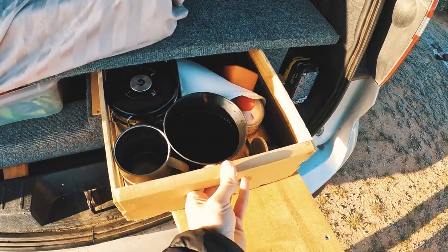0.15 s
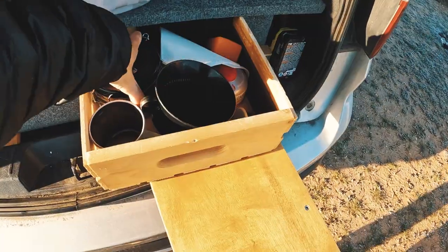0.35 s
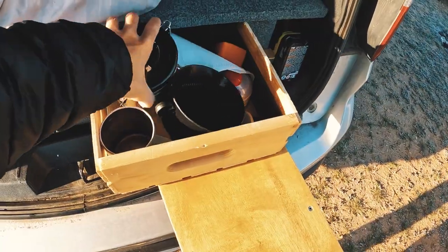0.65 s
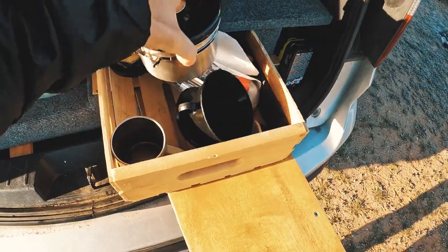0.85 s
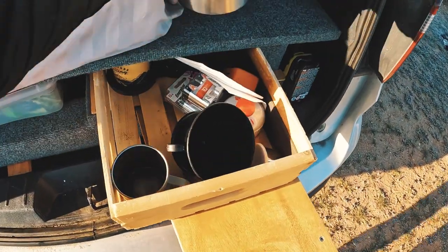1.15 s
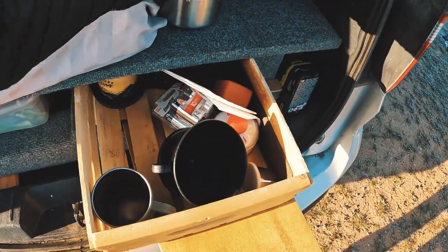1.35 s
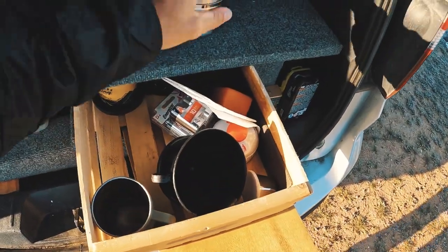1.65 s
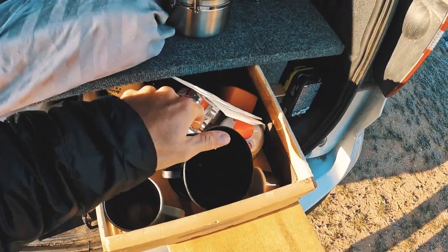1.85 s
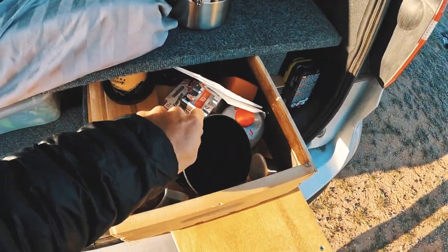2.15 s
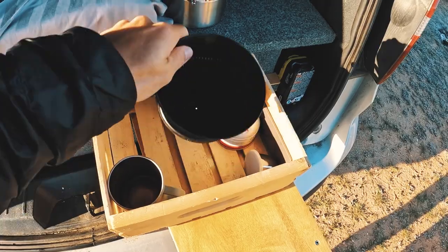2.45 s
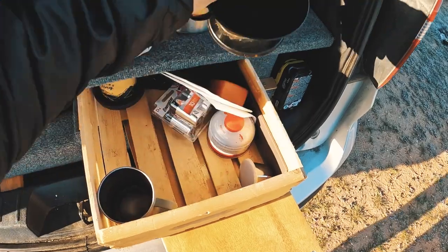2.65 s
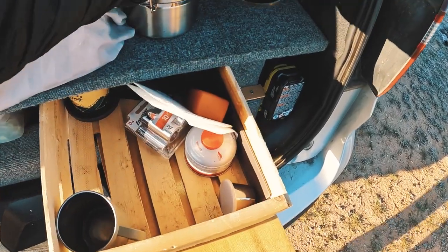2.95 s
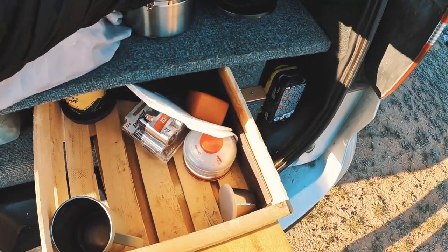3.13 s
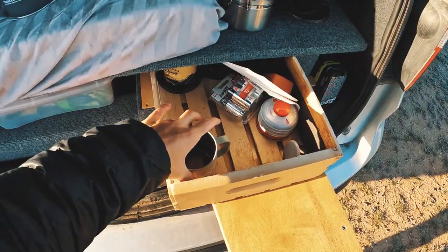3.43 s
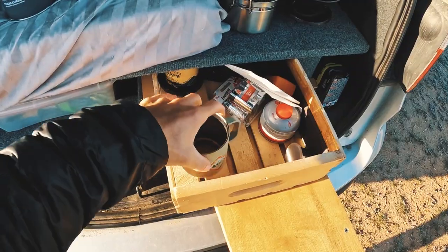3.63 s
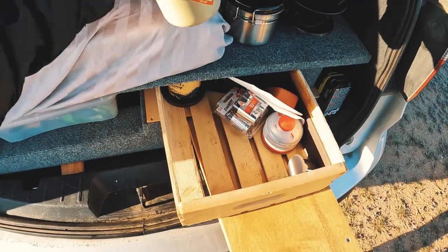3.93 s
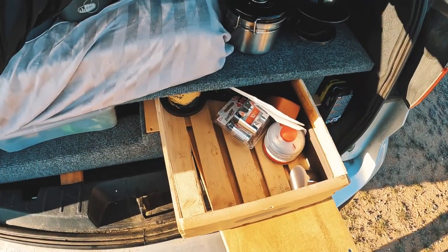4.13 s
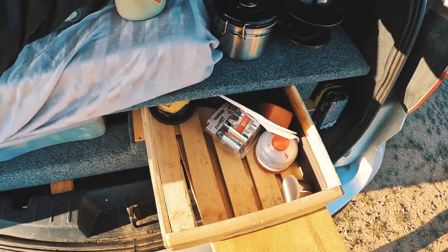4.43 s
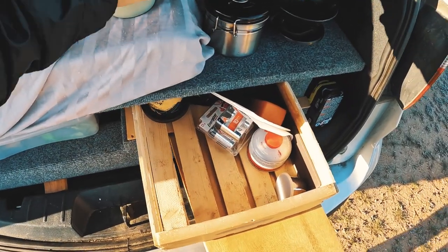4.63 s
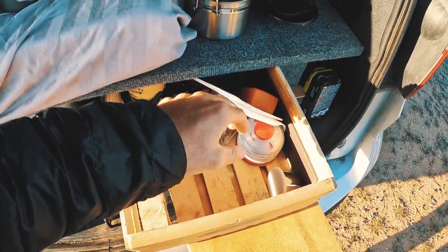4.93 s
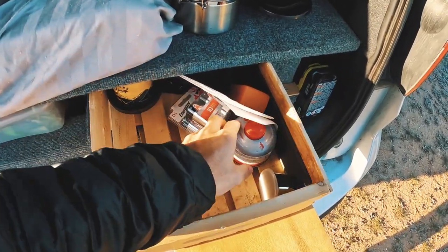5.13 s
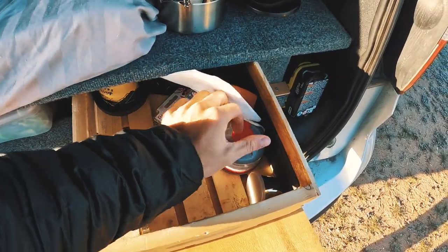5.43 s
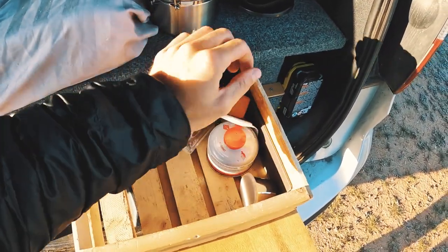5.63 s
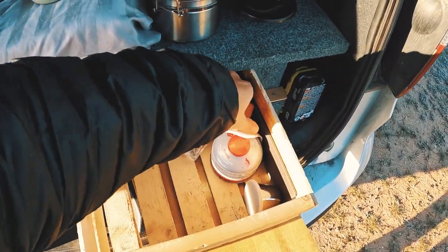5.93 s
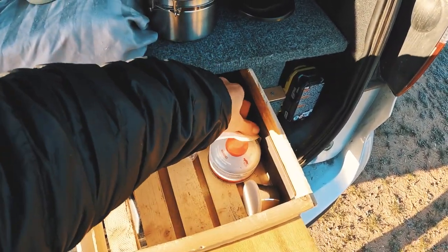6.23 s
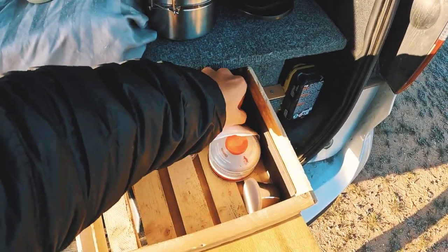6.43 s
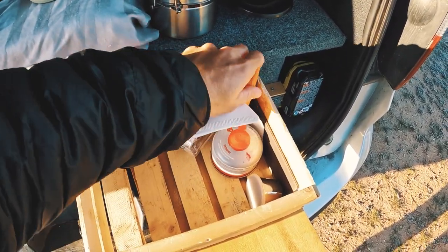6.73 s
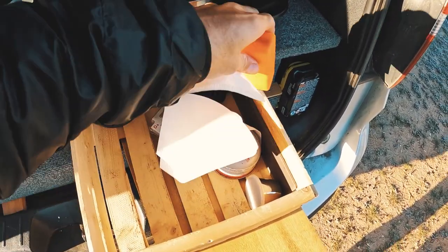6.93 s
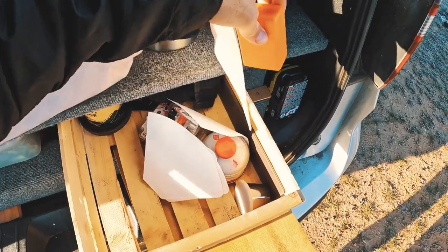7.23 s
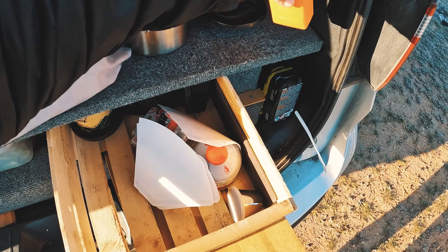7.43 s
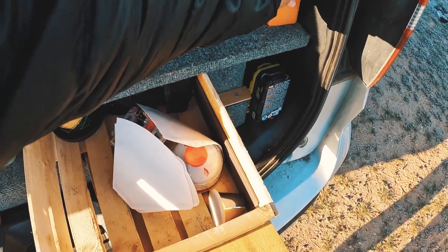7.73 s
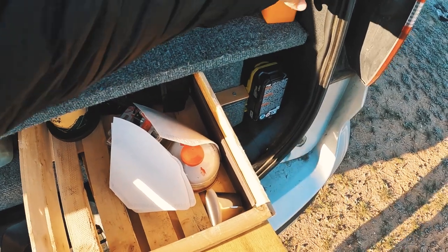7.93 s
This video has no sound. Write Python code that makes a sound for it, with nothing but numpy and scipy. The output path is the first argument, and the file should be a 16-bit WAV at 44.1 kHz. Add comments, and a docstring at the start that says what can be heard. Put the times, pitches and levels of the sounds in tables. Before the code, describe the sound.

A wooden drawer scrapes open with a brief squeak, low thumps and a thin steel clink. A pot drags over the slats, and scattered knocks follow as camping gear is lifted out. A nylon sleeve swishes, paper crackles, and a loud cluster of knocks comes near the end. The microphone is close, outdoors at the open back of a car, with wind buffeting it over a distant engine hum.

```python
"""Outdoors at the open back of a car, stereo microphone close to a wooden drawer.
Wind buffets the microphone over a far engine hum. The drawer scrapes open on a squeaking runner and
a hand lifts out pots, a mug and a box: low thumps sound, struck wood knocks, paper crackles,
a nylon sleeve swishes and thin steel clinks. A far bird whistles twice."""
import sys
import numpy as np
from scipy import signal
from scipy.fft import rfft, irfft
from scipy.io import wavfile
from scipy.ndimage import uniform_filter1d

SR = 44100
rng = np.random.default_rng(int(sys.argv[2]) if len(sys.argv) > 2 else 0)


def dump_mix(stems):
    """Bounce the given channels to the path in sys.argv[1] as a 16-bit WAV at rate SR."""
    frames = np.atleast_2d(stems).T  # one column per channel
    limited = np.clip(frames, -1, 1)  # hard clip at full scale
    pcm = np.round(limited * 32767).astype(np.int16)
    wavfile.write(sys.argv[1], SR, pcm)


N = 356328


def amp(db):
    return 10 ** (np.asarray(db) / 20)


def unit_rms(x):
    return x / np.sqrt(np.mean(x ** 2) + 1e-20)


def curve(rows):
    """Every column of a table at every sample; the ends are held."""
    s, *columns = np.transpose(rows)
    return [np.interp(np.arange(N) / SR, s, c) for c in columns]


def shaped(x, spectrum):
    """Colours x by a spectrum, result at rms 1."""
    f, db = np.transpose(spectrum)
    hz = np.fft.rfftfreq(x.shape[-1], 1 / SR)
    gain = amp(np.interp(np.log(hz + 1), np.log(f + 1), db))
    return unit_rms(irfft(rfft(x) * gain, x.shape[-1]))


def band(x, lo_hz, hi_hz):
    sos = signal.butter(2, [lo_hz, min(hi_hz, SR / 2.2)], "bandpass", fs=SR, output="sos")
    return signal.sosfiltfilt(sos, x)


def ring(x, hz, width_hz):
    """One resonance, result at rms 1."""
    return unit_rms(signal.lfilter(*signal.iirpeak(hz, hz / width_hz, SR), x))


def rise(t, s):
    """Soft start lasting s seconds."""
    return np.sin(np.pi / 2 * np.minimum(t / s, 1)) ** 2


def arch(peak_s, rise_s, fall_s, ends_db):
    """A swell in dB: 0 at the peak, ends_db where rise begins and fall ends."""
    t = np.arange(N) / SR - peak_s
    return ends_db * np.minimum(np.where(t < 0, -t / rise_s, t / fall_s) ** 1.34, 20)


def add(mix, s, sound):
    part = mix[max(round(s * SR), 0):][:len(sound)]
    part += sound[:len(part)]


def friction(per_s, spread_db, smooth):
    """Smooth rubbing noise plus sparse slips of uneven size, each a few ms long."""
    slips = amp(spread_db * np.minimum(rng.exponential(1, N), 4)) * (rng.random(N) < per_s / SR)
    swell = unit_rms(signal.lfilter([1], [1, -np.exp(-1 / (0.0074 * SR))], slips))
    return unit_rms((smooth + swell) * rng.standard_normal(N))


# Wind right on the microphone: t/s, level/dB
GUSTS = [(0, -34.5), (.3, -25.5), (.42, -44), (.65, -38), (1.1, -41), (1.42, -47), (1.7, -48), (2.25, -35),
         (2.7, -47), (3.35, -40.5), (3.9, -31.5), (4.05, -39.5), (4.18, -50.5), (4.8, -41.5), (5.2, -51.5),
         (5.78, -37.5), (6.1, -46.5), (7.0, -45.5), (7.7, -45.5), (7.9, -39), (8.08, -48.5)]
# Spectra of its low buffet and its wider roar: f/Hz, relative level/dB
BUFFET_SPECTRUM = [(15, 34), (30, 35.5), (55, 33.5), (90, 0), (150, -2), (300, -66)]
ROAR_SPECTRUM = [(35, -6), (60, -2), (151, -9), (238, -13), (272, -15.5), (461, -30.5), (583, -33.5),
                 (748, -40.5), (2000, -58.5), (2600, -106), (4400, -120)]
# Eddies across the microphone's two ports: peak t/s, rise/s, fall/s, level/dB re wind
EDDIES = [(3.698, 0.44, 0.38, -7), (8.0, 0.9, .3, -15.5)]


def wind():
    """Gusts buffet both ports alike under a lumpy roar; eddies reach them in opposite phase."""
    db, = curve(GUSTS)
    drift = uniform_filter1d(uniform_filter1d(rng.standard_normal(N), 1500), 1500)
    lumps = amp(2.75 * unit_rms(drift))
    buffet = shaped(rng.standard_normal((2, N)), BUFFET_SPECTRUM)
    roar = shaped(rng.standard_normal((2, N)), ROAR_SPECTRUM)
    roar_db = -11.5 + 0.7 * db  # follows the gusts only in part
    common, eddy = amp(db) * buffet + amp(roar_db) * unit_rms(lumps * roar)
    eddy_gain = sum(amp(top_db + arch(*timing, ends_db=-32)) for *timing, top_db in EDDIES)
    return common + eddy_gain * eddy * np.array([[1], [-1]])


# Orders of an engine, far off: f/Hz, width/Hz, level/dB before any swell
ENGINE_ORDERS = [(93, 5.6, -47.5), (186.1, 1.78, -47.5), (279.4, 1.6, -63.5)]
# Swell of the second order: t/s, gain/dB
SECOND_ORDER_SWELL = [(0, 7.5), (1, -4.5), (3.2, -2), (3.6, -10.5), (7, -3.5), (8.08, -8)]


def engine_hum():
    """Each engine order is a steady tone in a wavering halo of narrow noise."""
    t, orders = np.arange(N) / SR, []
    for hz, width_hz, db in ENGINE_ORDERS:
        halo = ring(ring(rng.standard_normal(N), hz, width_hz), hz, 4 * width_hz)
        tone = np.sin(2 * np.pi * (hz * t + rng.random()))
        orders.append(amp(db) * unit_rms(halo + 1.04 * tone))
    swell_db, = curve(SECOND_ORDER_SWELL)
    return orders[0] + amp(swell_db) * orders[1] + orders[2]


# Close up, the drawer and then a pot dragged over wood, one list a drag: t/s, level/dB
DRAGS = [
    [(0, -39.5), (.05, -39.5), (.13, -41), (.26, -46), (.45, -51.5), (.48, -68), (.56, -61)],
    [(.69, -81), (.74, -40.5), (.85, -45.5), (.98, -45.5), (1.06, -63), (1.09, -77)],
]
# Treble of each drag: level/dB re that drag
DRAG_BRIGHT_DB = [-9.5, -8.5]
# Resonances of slats and pots: f/Hz, width/Hz, relative level/dB
DRAG_MODES = [(950, 95, 9), (1292, 81, 6), (1586, 69, 3), (1847, 240, 9.5), (2360, 640, 2), (3150, 230, -5),
              (4500, 820, -9.5)]


def drags():
    """Stick-slip grit excites the slats and the pots standing on them."""
    out, t = np.zeros(N), np.arange(N) / SR
    grit = friction(per_s=200, spread_db=3, smooth=1.2)
    scrape = unit_rms(sum(amp(db) * ring(grit, hz, width) for hz, width, db in DRAG_MODES)) + .8 * grit
    dull = unit_rms(band(scrape, 200, 703))
    middle = unit_rms(band(scrape, 1046, 5200))
    bright = unit_rms(band(scrape, 3800, 9360)) + 0.17 * band(grit, 9500, 13000)
    for rows, bright_db in zip(DRAGS, DRAG_BRIGHT_DB):
        db, = curve(rows)
        dull_db = -21.5 + 0.6 * db  # follows the level only in part
        start_s, end_s = rows[0][0], rows[-1][0]
        gate = np.clip(np.minimum(t - start_s + 0.022, end_s - t) / 0.016, 0, 1)
        out += gate * (amp(db) * (middle + amp(bright_db) * bright) + amp(dull_db) * dull)
    return out


# Low thumps close by (things set down, the drawer juddering, a gust on the microphone):
# t/s, peak level/dB, f/Hz
THUDS = [(.004, -23, 54.4), (0.227, -22.5, 60.3), (0.088, -18.5, 57.5), (0.118, -17.5, 84),
         (0.24, -22.5, 113), (0.171, -20, 68), (0.261, -23, 106.5), (0.287, -22, 52), (1.018, -24.5, 195),
         (1.488, -15.5, 147.4), (1.498, -13, 60.8), (1.561, -21.5, 90.7), (3.156, -16.5, 206),
         (3.168, -16, 113.7), (3.401, -25, 67.6), (3.612, -27, 146), (3.684, -24, 116.6),
         (3.77, -30.5, 139), (3.81, -21.5, 52.7), (3.943, -23.5, 167), (4.377, -26, 50.4),
         (5.681, -25.5, 48.4), (5.8, -25.5, 62), (7.819, -13.5, 95), (7.84, -18, 58.6), (7.9, -27, 52)]


def thuds():
    """A soft push sets off a few low swings that sag in pitch, over a sway an octave below."""
    out, t = np.zeros(N), np.arange(10000) / SR
    for s, db, hz in THUDS:
        phase = 2 * np.pi * hz * (t + 0.0041 * (1 - np.exp(-t / 0.0041)))
        thump = np.sin(phase) + 0.25 * np.sin(2.456 * phase) * amp(-60 * t / 0.076)
        sway = 0.2 * np.sin(phase / 2)
        t60 = 0.087 * amp(0.05 * (db + 25.5))  # louder thumps ring longer
        swing = (thump + sway) * amp(-60 * t / t60) * rise(t, 0.0068)
        add(out, s - .003, -amp(db) * swing / abs(swing).max())
    return out


# The drawer's runner, close up: peak t/s, half length/s, f/Hz, level/dB
SQUEAKS = [(0.061, 0.074, 3190, -38.5), (.062, 0.027, 2440, -41), (0.077, 0.039, 1638, -37.5),
           (0.121, 0.023, 1603, -43), (0.132, 0.04, 2120, -52)]


def squeaks(width_hz=110, glide_hz_per_s=1100, ends_db=-15):
    """The runner binds for a moment: narrow, rough tones that glide up as the contact moves."""
    out, t = np.zeros(N), np.arange(-4000, 4000) / SR
    for s, half_s, hz, db in SQUEAKS:
        rough = signal.lfilter([1], [1, -np.exp(-np.pi * width_hz / SR)], rng.standard_normal((2, len(t))))
        phase = 2 * np.pi * (hz * t + glide_hz_per_s * t ** 2 / 2)
        tone = unit_rms(rough[0] * np.cos(phase) + rough[1] * np.sin(phase))
        tone *= amp(db + ends_db * (t / half_s) ** 2)
        skip = max(4000 - round(s * SR), 0)
        add(out, s + t[skip], tone[skip:])
    return out


# Knocks and snaps in the drawer, close up: t/s, body peak level/dB, body f/Hz,
# crack level/dB, crack f/Hz, hardness/(dB per octave), share of the free ringing time
KNOCKS = [(0.117, -29.5, 325, -36, 3430, -11, 0.79), (0.24, -25, 317, -40, 3130, -5, 1.3),
          (0.258, -22.5, 636, -58, 2850, -8, 0.42), (0.353, -21, 340, -20.5, 4360, -3.5, 1.7),
          (.392, -24, 500, -36, 1800, -6, 2.5), (.443, -29.5, 980, -41, 2400, -17, 0.68),
          (.746, -28, 890, -44, 4500, 2, 0.98), (.772, -26.5, 351, -41, 4500, -7, 1.2),
          (.803, -27.5, 870, -46, 2200, 6, .9), (.821, -28, 514, -35.5, 4560, 11, 1.1),
          (0.854, -34, 470, -37, 2600, -1, 1.1), (.88, -20, 1290, -24, 1790, -6, .5),
          (.881, -27, 350, -30, 5300, -2, 0.37), (0.918, -32, 370, -30, 2090, -15, 1),
          (0.964, -21, 790, -30, 3920, -1, 0.66), (1.017, -32.5, 3210, -30, 2980, -10, .7),
          (1.021, -15.5, 343, -28, 2170, -2, 0.63), (1.046, -23, 367, -31, 4260, 7, 1.5),
          (1.091, -33.5, 315, -56, 3100, 2, 1.2), (1.188, -40, 482, -60, 2700, -21, 1.35),
          (1.487, -17, 289, -36, 2090, -18, 1.06), (2.101, -31, 321, -57, 2590, -38, 0.42),
          (2.246, -34, 328, -46.5, 2700, 1, .9), (2.343, -29, 482.6, -47, 2820, -11, 1.9),
          (3.119, -30.5, 372, -38.5, 3630, 2, 1.6), (3.157, -17, 840, -37, 3270, -31, 0.89),
          (3.158, -17, 535, -67, 2400, -21, 0.5), (3.172, -28.5, 361, -34.5, 2520, -17, 0.77),
          (4.368, -29, 332, -51.5, 900, -13, 2.3), (4.394, -33, 1315, -42, 1510, 1, 0.7),
          (5.181, -48.5, 350, -52, 5230, -21, 0.73), (5.302, -48, 357, -51.5, 2750, -10, 0.71),
          (5.345, -41, 319, -46, 1470, -1, 2.4), (5.4, -39.5, 1310, -48, 1400, -7.5, 0.82),
          (5.518, -48, 326, -50, 2700, -13, 0.75), (5.569, -13.5, 590, -26, 2110, 0, 0.58),
          (5.569, -23, 2910, -33, 2600, -12, 0.7), (5.572, -21.5, 930, -22.5, 1330, -17, 2),
          (5.591, -20.5, 607, -43, 2270, -8, 0.49), (6.276, -55, 1900, -50, 3300, -7, .7),
          (6.513, -29.5, 1194, -32.5, 2500, -9, 0.44), (6.559, -37.5, 1220, -59, 5000, -8, 0.69),
          (6.591, -27, 1235, -43, 2040, 18, 0.43), (6.799, -43, 674, -49.5, 2800, 4, 0.71),
          (6.815, -33, 593, -40.5, 2670, 12, 0.26), (7.016, -45, 640, -38, 2320, -12, 0.73),
          (7.026, -36, 695, -37, 2460, -9, 0.47), (7.055, -36, 990, -41, 3500, -5, 1.6),
          (7.073, -34, 967, -46, 4500, -7, 1.5), (7.12, -38, 1250, -39, 2400, 5, 0.58),
          (7.132, -31, 904, -38.5, 2550, -10, 0.49), (7.166, -34, 645, -36, 2270, -7, 0.55),
          (7.198, -37.5, 960, -52, 2750, -20, 1), (7.246, -44.5, 319, -49.5, 2500, 5, 0.77),
          (7.282, -33.5, 800, -53, 2190, 15, 0.45), (7.413, -55, 950, -59, 3000, -12, .6),
          (7.659, -36, 341, -34.5, 3730, 12, 1.4), (7.695, -45, 620, -46, 2770, 5, 0.55),
          (7.771, -52, 1530, -40.5, 3500, -5, .9), (7.796, -27.5, 1410, -37.5, 4600, -18, 1.1),
          (7.807, -16.5, 1470, -22.5, 4500, -20, 0.72), (7.809, -13.5, 1086, -29, 1300, -6, 0.57),
          (7.812, -23, 403, -49, 6000, -10, 0.86), (7.815, -15, 1079, -27.5, 4270, -10, 1.3),
          (7.83, -28, 1070, -44, 2800, -14, .9), (7.857, -25.5, 1020, -44.5, 5400, -7, 1.2),
          (7.876, -27.5, 1017, -50, 5370, 1.5, 0.79), (7.996, -31.5, 1230, -29.5, 4530, 14, 0.2)]
# Modes of a wooden slat: nominal multiple of the body's f, relative level/dB
SLAT_MODES = [(0.601, -10), (1, -1), (1.501, -11), (2.101, -3), (3.3, -2.5), (4.799, -7.5)]


def crack(t, hz):
    """The noise of a hard contact: a quick snap, then a faint rattle."""
    grit = rng.standard_normal(len(t))
    snap = unit_rms(band(grit, 0.52 * hz, 1.34 * hz)) + 0.65 * unit_rms(band(grit, 700, 1.9 * hz))
    top = 0.079 * (hz / 5000) ** 2 * grit
    decay = amp(-60 * t / 0.029) + 0.05 * amp(-60 * t / 0.08)
    return (snap + top) * rise(t, 0.0039) * decay


def knocks():
    """Each blow rings the modes of the struck piece, which chatter in uneven contact, and cracks."""
    out, t = np.zeros(N), np.arange(6000) / SR
    multiple, mode_db = np.transpose(SLAT_MODES)[:, :, None]
    for s, db, hz, crack_db, crack_hz, hard_db, free in KNOCKS:
        t60 = np.clip(free, .2, 2) * 0.077 * (616 / hz) ** 0.66  # smaller, higher pieces die sooner
        phase, shape = rng.random((2, len(SLAT_MODES), 1))
        f = hz * multiple ** (0.967 + 0.12 * shape)  # no two pieces share their proportions
        decay_db = 60 * t / t60 * np.maximum(multiple, 1) ** 1.83
        level_db = mode_db + hard_db * abs(np.log2(multiple)) - decay_db
        chatter = 1 + 1.13 * unit_rms(band(rng.standard_normal((len(SLAT_MODES), len(t))), 27.5, 440))
        modes = chatter * amp(level_db) * np.sin(2 * np.pi * (f * t + phase))
        body = modes.sum(0) * rise(t, 0.0035)
        add(out, s - .001, amp(db) * body / abs(body).max() + amp(crack_db) * crack(t, crack_hz))
    return out


# Sleeve and paper moving near the microphone: peak t/s, rise/s, fall/s, level/dB, treble/dB re level
SWISHES = [(.45, 0.22, 0.082, -51, -20), (1.15, 0.72, 0.61, -61.5, -10.5), (1.74, 1, 0.23, -64.5, -7.5),
           (2.079, 0.036, 0.077, -62, -8), (2.25, .07, 0.037, -62.5, -4.5),
           (2.339, 0.045, 0.038, -55, -6.5), (2.52, .15, 0.12, -66.5, -7.5), (2.69, 0.05, 0.3, -61, -2),
           (3.03, 0.4, 0.22, -63, -6), (3.62, 0.04, 0.05, -72, -6.5), (4.1, 0.4, 0.42, -66, -8),
           (4.391, 0.019, 0.028, -52.5, -9), (4.92, 0.37, 0.15, -55.5, -15), (5.26, 0.1, 0.93, -63, -3.5),
           (5.54, 0.082, 0.12, -53.5, -8), (6.15, 0.18, 0.22, -57, -7.5), (6.39, 0.056, 0.054, -54.5, -3.5),
           (6.52, 0.039, 0.066, -46.5, -5.5), (6.599, 0.049, 0.037, -48, -3), (6.68, 0.17, 0.15, -57.5, -8),
           (6.88, 0.15, 0.44, -58, -6.5), (7.06, 0.062, 0.066, -50.5, -3.5), (7.16, 0.091, 0.041, -49, -6),
           (7.25, 0.037, 0.032, -56.5, -8), (7.55, 0.39, 0.4, -66, -5.5),
           (7.675, 0.045, 0.052, -56.5, -3.5), (7.84, 0.092, 0.059, -46.5, -12),
           (8.06, 0.16, .1, -60.5, -8)]
# Spectra of the rubbing and of its thin, airy top: f/Hz, relative level/dB
CLOTH_SPECTRUM = [(290, -34.5), (500, 15.5), (827, -7.5), (1490, -7), (1800, -10), (3330, -8.5),
                  (11300, -21.5), (12700, -19), (15500, -54)]
AIRY_SPECTRUM = [(9000, -22.5), (11000, -14), (12000, -7.5), (13200, -6), (14200, -16), (15500, -25.5)]


def rustle():
    """Nylon and paper rub with a fine grit, each swish with its own treble; the thin top is stereo."""
    cloth = shaped(friction(per_s=60, spread_db=2, smooth=4), CLOTH_SPECTRUM)
    level = bright = amp(-92)  # when nothing moves
    for peak_s, rise_s, fall_s, db, bright_db in SWISHES:
        swish = amp(db + arch(peak_s, rise_s, fall_s, ends_db=-11.5))
        level = np.hypot(level, swish)
        bright = np.hypot(bright, amp(bright_db) * swish)
    low, high = unit_rms(band(cloth, 688, 3540)), unit_rms(band(cloth, 4020, 9950))
    airy = shaped(rng.standard_normal((2, N)), AIRY_SPECTRUM) * amp([[-29.], [-34.]])
    return level * low + bright * high + bright ** 0.69 * airy


# Steel on steel, close up: t/s, peak level/dB, hardness/(dB per octave), share of the free ringing time
CLINKS = [(0.351, -23, -1, 0.3), (.36, -30, 0, 1.1), (.445, -43, -1.5, .7), (3.1143, -44, -3, 0.32),
          (3.5804, -54, -1, 0.4), (5.7085, -48, 1.5, 0.25)]
# Modes of a steel wall: f/Hz, relative level/dB, free t60/s
STEEL_MODES = [(1545, -15, .3), (1739, -3, .2), (2013, -10, .3), (3160, -14, .12), (3591, -11, .15),
               (4027, -9, .12), (4188, -7, .24), (5243, -10, .2), (4334, -5, .09), (5642, -11, .1),
               (4640, -8, .22), (5012, -9, .17), (6735, -6, .08)]


def clinks():
    """Thin steel walls ring, damped by what they touch; harder contact favours high modes."""
    out, t = np.zeros(N), np.arange(16000) / SR
    f, mode_db, t60 = np.transpose(STEEL_MODES)[:, :, None]
    for s, db, hard_db, free in CLINKS:
        phase, spot = rng.random((2, len(STEEL_MODES), 1))
        decay_db = 60 * t / (t60 * np.clip(free, .1, 1.2))
        level_db = mode_db + 3 * spot + hard_db * np.log2(f / 3000) - decay_db
        modes = amp(level_db) * np.sin(2 * np.pi * (f * t + phase))
        walls = modes.sum(0) * np.minimum(t / 0.0012, 1)
        add(out, s, amp(db) * walls / abs(walls).max())
    return out


# A bird, far off: top of the note t/s, level/dB
BIRD_NOTES = [(1.65, -68), (6.087, -62)]


def bird(start_hz=1440, top_hz=1910, end_hz=1488, rise_s=.14, fall_s=.21):
    """An arching whistle: a near sine that climbs fast, sags slowly and fades at both ends."""
    out, t = np.zeros(N), np.arange(-rise_s, fall_s, 1 / SR)
    from_top = np.where(t < 0, -t / rise_s, t / fall_s)
    climb = (start_hz - top_hz) * np.sin(np.pi / 2 * from_top) ** 2
    sag = (end_hz - top_hz) * from_top ** 1.2
    hz = top_hz + np.where(t < 0, climb, sag)
    note = np.sqrt(2) * np.sin(2 * np.pi * np.cumsum(hz) / SR) * np.clip((1 - from_top) / .1, 0, 1)
    for s, db in BIRD_NOTES:
        waver_db = 4 * unit_rms(uniform_filter1d(rng.standard_normal(len(t)), 250))
        add(out, s + t[0], amp(db + waver_db - 14 * from_top ** 3) * note)
    return out


def boot_reverb(x, t60=0.082):
    """Short diffuse tail of the open car boot, with a faint stereo spread in the treble."""
    t = np.arange(8000) / SR
    mid, side = band(rng.standard_normal((2, len(t))), 110, 7400) * amp(-60 * t / t60) * (t > .003)
    side = 0.045 * band(side, 2500, 12000)
    tails = np.array([mid + side, mid - side]) / np.linalg.norm(mid)
    return signal.oaconvolve(x[None], tails, axes=1)[:, :N]


def scene():
    """Close sounds ring in the boot; rustle, wind and the far sounds reach the microphone dry."""
    near = drags() + squeaks() + knocks() + clinks() + thuds()
    return near + amp(-14) * boot_reverb(near) + rustle() + wind() + engine_hum() + bird()


def record(dry):
    """The recorder's band limit: a steep low-pass at 15.3 kHz."""
    lowpass = signal.firwin(511, 15300, window=("kaiser", 9), fs=SR)
    return signal.oaconvolve(dry, lowpass[None], "same")


dry = scene()
out = record(dry)
dump_mix(out)
```